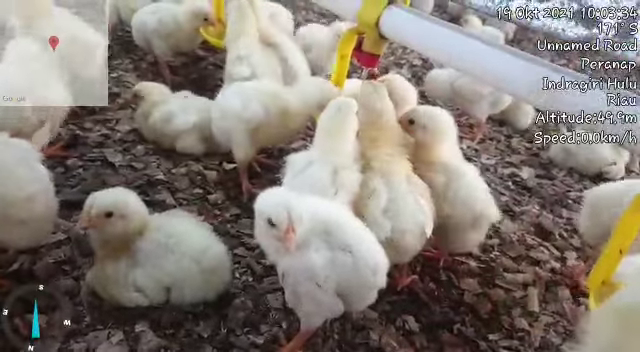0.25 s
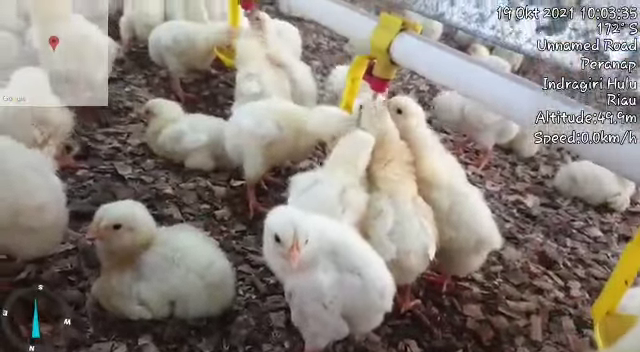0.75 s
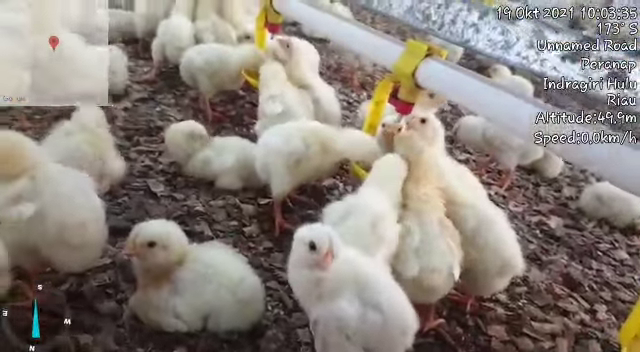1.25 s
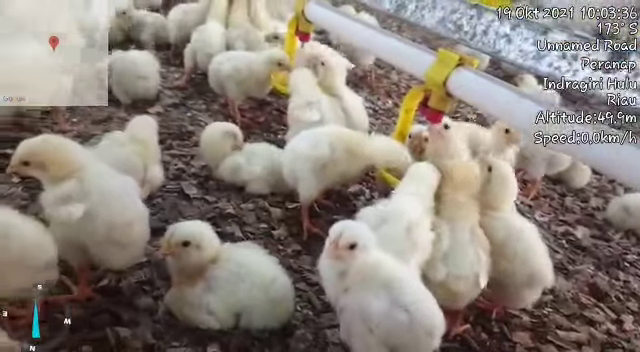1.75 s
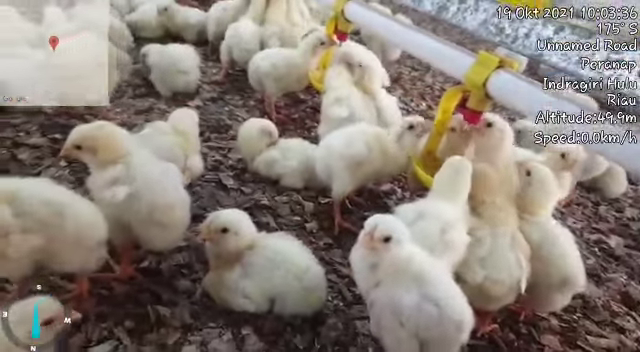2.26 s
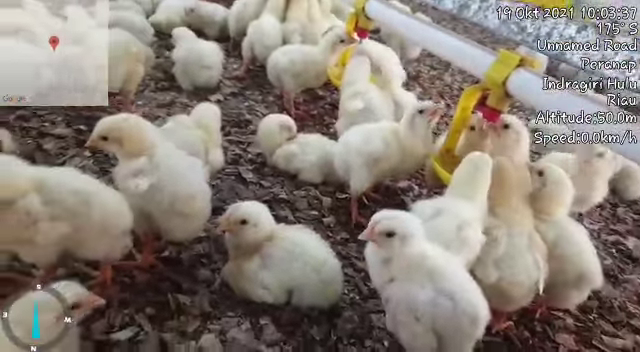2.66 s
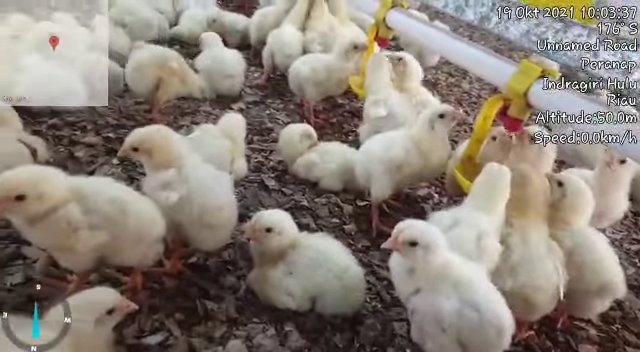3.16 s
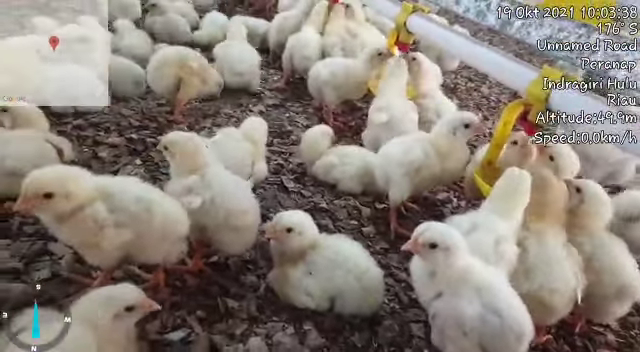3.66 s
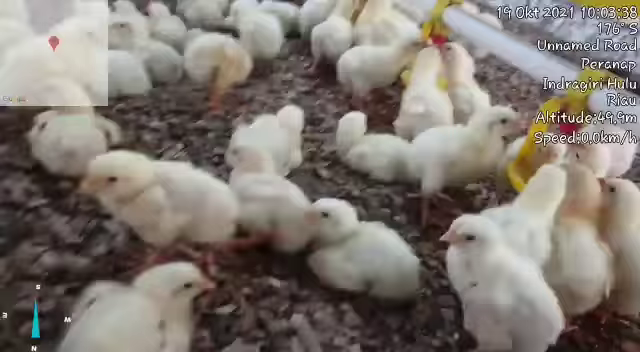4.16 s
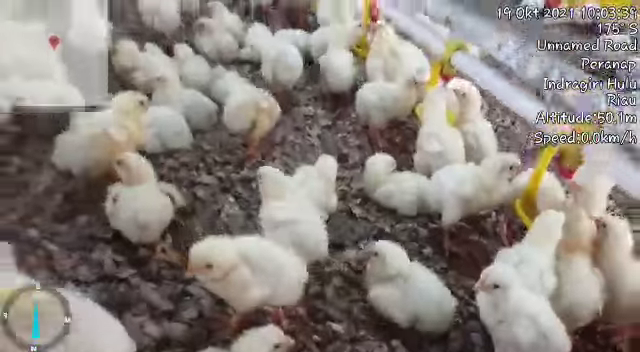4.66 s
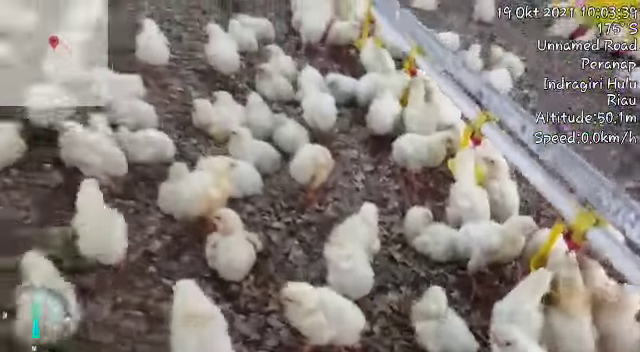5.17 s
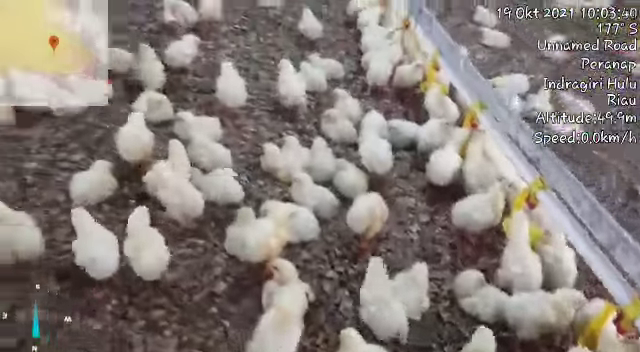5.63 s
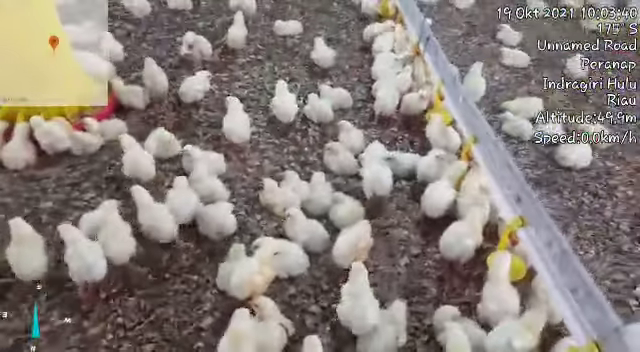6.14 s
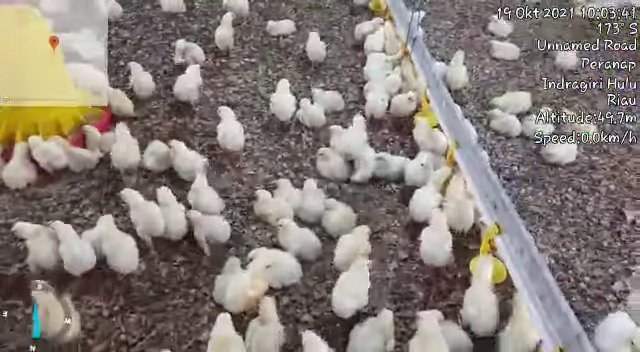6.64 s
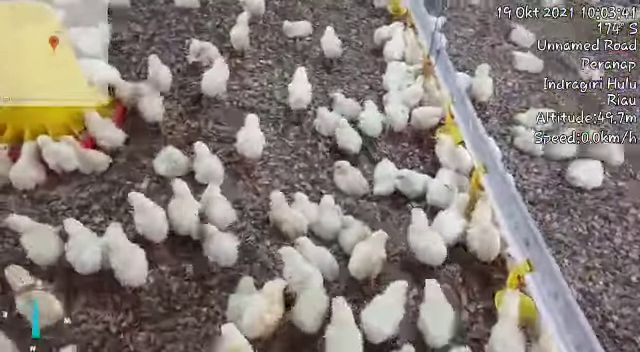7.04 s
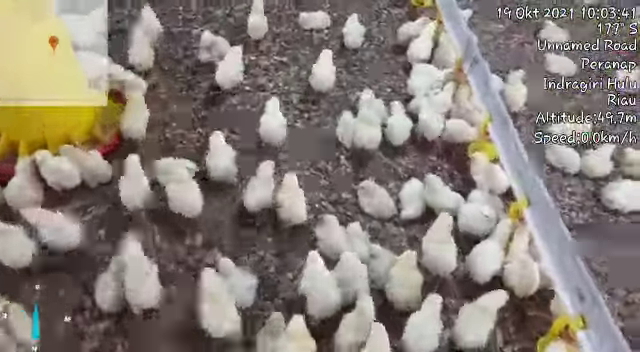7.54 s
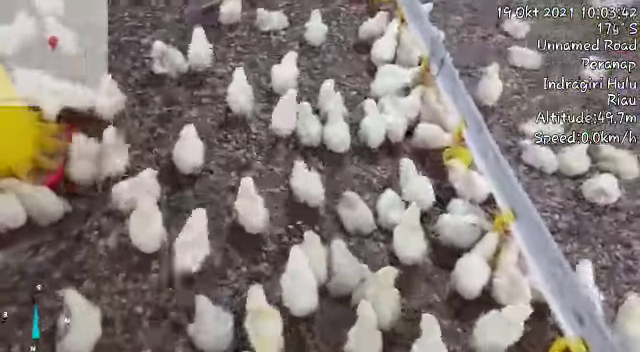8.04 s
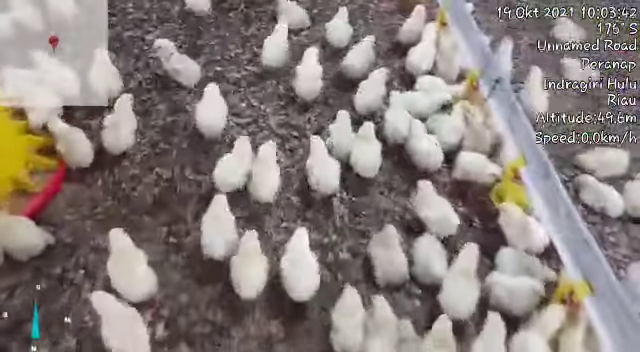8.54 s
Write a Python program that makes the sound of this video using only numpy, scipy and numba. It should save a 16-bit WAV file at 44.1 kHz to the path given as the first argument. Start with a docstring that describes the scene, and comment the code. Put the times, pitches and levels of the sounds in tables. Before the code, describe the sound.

A dense flock of chicks cheeps with short falling whistles and quick trills, amid dry ticks, litter rustle, a few hollow knocks and soft fan rumble.

```python
"""Chick flock in a poultry house

Heard by a two-microphone phone lifted from the litter. Near chicks give gliding whistled peeps and swinging
trills over a random chorus of far ones. Beaks and feet tick and rustle as filtered noise bursts; something
hollow is knocked and rings its modes; low swings thump the phone body. A fan hums in harmonics over
shaped house noise, and air stirs at the microphone ports as low noise."""
import sys
import numpy as np
from scipy import signal
from scipy.io import wavfile
from scipy.ndimage import uniform_filter1d
from numba import njit

SR = 44100
rng = np.random.default_rng(int(sys.argv[2]) if len(sys.argv) > 2 else 0)


def dump_mix(stems):
    """Bounce the given channels to the path in sys.argv[1] as a 16-bit WAV at rate SR."""
    frames = np.atleast_2d(stems).T  # one column per channel
    limited = np.clip(frames, -1, 1)  # hard clip at full scale
    pcm = np.round(limited * 32767).astype(np.int16)
    wavfile.write(sys.argv[1], SR, pcm)


N = 388080


def undb(db):
    """Decibels to gain."""
    return 10 ** (np.asarray(db) / 20)


def level(x, db):
    """Scale to an rms level."""
    return x * undb(db) / np.sqrt(np.mean(x ** 2))


def curve(rows, axis=1):
    """One column of a (t/s, value, ..) table at every sample."""
    table = np.array(rows)
    return np.interp(np.arange(N) / SR, table[:, 0], table[:, axis])


def at_hz(rows, hz):
    """A (f/Hz, value) table read on a log axis."""
    table = np.array(rows)
    return np.interp(np.log(hz), np.log(table[:, 0]), table[:, 1])


def walk(rate_hz):
    """Random levels held 1 / rate and slewed twice; spread near 1."""
    hold = int(SR / rate_hz)
    steps = np.repeat(rng.standard_normal(N // hold + 1), hold)
    return 1.3 * uniform_filter1d(uniform_filter1d(steps, hold), hold)[:N]


def band(x, hz, width_hz):
    """Resonance with gain 1 at its centre."""
    return signal.lfilter(*signal.iirpeak(hz, hz / width_hz, fs=SR), x)


def spikes(s, db, pan_db, lag_s):
    """One impulse per event in each channel, split by level and by right-channel lag."""
    out = np.zeros((2, N))
    for side, sign in enumerate((1, -1)):
        at = np.clip(((s - sign * lag_s / 2) * SR).astype(int), 0, N - 1)
        np.add.at(out[side], at, undb(db + sign * pan_db / 2))
    return out


ROOM_T60_S, ROOM_DB, FAR_ROOM_DB = 0.24, -10.0, -6.0


def room(x, wet_db):
    """Diffuse tail: decaying noise, unrelated in the two channels."""
    t = np.arange(int(0.4 * SR)) / SR
    tail = rng.standard_normal((2, len(t))) * 1000 ** (-t / ROOM_T60_S)
    tail *= np.clip(t / 0.0016, 0, 1)  # soft onset
    tail *= undb(wet_db) / np.sqrt(np.sum(tail ** 2, axis=1, keepdims=True))
    return x + signal.fftconvolve(x, tail, axes=1)[:, :N]


# noise balance: f/Hz, left minus right/dB
BALANCE_DB = [(50, -9.5), (130, 1.5), (380, 9.5), (1300, 6), (2400, -1), (15000, -1.5)]
# noise likeness: f/Hz, left-right correlation
LIKENESS = [(60, 0.35), (150, 0.65), (400, 0.23), (1000, 0.39), (2000, -0.22), (15000, 0.067)]


def noise_pair(hz, width_hz):
    """Stereo noise in one band, with the likeness and balance of that pitch."""
    like = np.clip(at_hz(LIKENESS, hz), -0.95, 0.95)
    noise = rng.standard_normal((2, N))
    mid, side = band(band(noise, hz, width_hz), hz, width_hz)
    pair = np.sqrt(1 + like) * mid + np.sqrt(1 - like) * side * np.array([[1], [-1]])
    return pair * undb(np.array([[0.5], [-0.5]]) * at_hz(BALANCE_DB, hz))


# house noise spectrum: f/Hz, relative level/dB per Hz
HOUSE = [(60, -13.5), (110, -5.5), (290, -24), (380, -23), (680, -25.5), (950, -16.5), (1300, -20),
         (2100, -22), (3000, -7), (5000, -19.5), (7800, -32.5), (11000, -17.5), (15000, -28.5)]
# swell of the noise around 1-2 kHz: t/s, level/dB (used relative to its mean)
MIDDLE = [(0.0, -70), (0.32, -57), (0.46, -67.5), (0.73, -70), (0.9, -62), (1.3, -71.5), (1.54, -61.5),
          (1.96, -70.5), (2.52, -61), (4.48, -65.5), (5.27, -62.5), (5.83, -70), (6.2, -66.5), (6.45, -57),
          (6.75, -62.5), (6.85, -57), (7.03, -61), (7.35, -64), (7.94, -66.5), (8.43, -65), (8.58, -61.5),
          (8.8, -63)]
MIDDLE_HZ, MIDDLE_OCTAVES, HOUSE_DB = 1430, 1, -52


def house():
    """Third-octave noise bands that drift in level, less in the treble; the middle ones swell together."""
    centres_hz = 60 * 2 ** np.arange(0, 8.1, 1 / 3)
    swell_db = curve(MIDDLE) - np.mean(curve(MIDDLE)) + 3.1 * walk(9)
    shares = np.exp(-(np.log2(centres_hz / MIDDLE_HZ) / MIDDLE_OCTAVES) ** 2)
    noise = np.zeros((2, N))
    for hz, share in zip(centres_hz, shares):
        drift_db = (3.6 if hz < 2993 else 1.6) * walk(4)
        noise += noise_pair(hz, hz / 3) * undb(at_hz(HOUSE, hz) + drift_db + share * swell_db)
    return level(noise, HOUSE_DB)


# house as the phone moves and turns, relative levels:
# t/s, air at the ports/dB, third fan harmonic/dB, fourth and fifth/dB
MOVING = [(0, -58.5, -67.5, -71.5), (1.2, -56.5, -70, -67.5), (2.2, -64, -71, -71.5),
          (3.2, -59.5, -64, -70), (4.2, -63, -63, -72.5), (4.8, -55, -62, -70), (5.8, -56.5, -75.5, -77.5),
          (6.6, -62, -94, -79.5), (7.8, -60, -83, -69.5), (8.8, -60, -91, -69.5)]
FAN_HZ = 56.26  # blade rate
DRONE_DB = 3.5  # over the fourth harmonic's setting


def fan():
    """Air rumble around the blade rate, wavering blade harmonics and an uneven drone."""
    air_db, third_db, upper_db = (curve(MOVING, axis=k) for k in range(1, 4))
    turn = 2 * np.pi * FAN_HZ * np.arange(N) / SR + 0.33 * walk(2)
    upper = np.sin(4 * turn) + 0.8 * np.sin(5 * turn) + 0.4 * np.sin(12 * turn)
    tones = undb(third_db) * np.sin(3 * turn) + undb(upper_db) * upper
    air = level(noise_pair(FAN_HZ, 35.0), 1.5) * undb(air_db + 2.2 * walk(5))
    drone_db = upper_db + curve(MIDDLE) - np.mean(curve(MIDDLE)) + 2 * walk(9.0)
    drone = level(noise_pair(952.0, 105.0), DRONE_DB) * undb(drone_db)
    return air + drone + tones * undb(0.78 * walk(3.56) + np.array([[1.5], [-1.5]]))


@njit
def whistle(rows, gains, overtone, swell, lean, n, sr):
    """Each peep is a near sine on a parabolic glide, with a soft start and end and a weak octave."""
    out = np.zeros((2, n))
    for e in range(len(rows)):
        s, length = rows[e, 0], rows[e, 1]
        start_hz, middle_hz, end_hz = rows[e, 2], rows[e, 3], rows[e, 4]
        bend = (start_hz + end_hz) / 2 - middle_hz
        slope = (end_hz - start_hz) / 2
        for side in range(2):
            start = s + side * rows[e, 7] / 1000  # right-channel lag in ms
            first = max(int(start * sr) + 1, 0)
            for i in range(first, min(int((start + length) * sr), n)):
                u = 2 * (i / sr - start) / length - 1  # -1 at the start, 1 at the end
                phase = np.pi * length * (middle_hz * u + slope * u * u / 2 + bend * u ** 3 / 3)
                envelope = (1 - u * u) ** swell * (1 + lean * u)
                tone = np.sin(phase) + overtone * np.sin(2 * phase)
                out[side, i] += gains[e, side] * envelope * tone
    return out


SWELL, LEAN = 0.42, 0.17  # softness of a peep's start and end; growth towards its end
OVERTONE_DB = -40.0


def sing(rows):
    """Whistle peeps: t/s, length/s, start/Hz, middle/Hz, end/Hz, level/dB, left minus right/dB, lag/ms."""
    gains = undb(rows[:, 5:6] + rows[:, 6:7] * np.array([0.5, -0.5]))
    return whistle(rows, gains, undb(OVERTONE_DB), SWELL, LEAN, N, float(SR))


WOBBLE_DB = 2  # fast random level flutter on the summed chorus and on the summed near calls
# far chorus: t/s, relative level/dB
CHORUS = [(0, -48), (.3, -49.5), (.8, -45.5), (1.2, -53), (1.8, -45.5), (2.9, -51.5), (4.4, -50.5),
          (5.1, -43.5), (6.4, -47.5), (6.9, -44.5), (7.3, -42), (7.58, -45), (7.75, -37), (8.35, -41),
          (8.8, -40)]
CHORUS_PEEPS_PER_S, CHORUS_LENGTH_S, CHORUS_SCATTER_DB = 220, 0.036, 2.5
CHORUS_HZ, CHORUS_SPREAD_HZ, CHORUS_FALL_HZ, CHORUS_ARCH_HZ = 2993, 331, 860, 192


def far_chicks():
    """Random peeps, mostly falling, from all directions; distance makes them wetter."""
    count = CHORUS_PEEPS_PER_S * N // SR
    even = rng.random((count, 2)).T
    bell = rng.standard_normal((count, 6)).T
    # calls crowd near the low end of the voice; the high callers are fewer and fainter
    high = np.minimum(np.abs(bell[5]), 1.9) * 1.8
    middle_hz = CHORUS_HZ + CHORUS_SPREAD_HZ * (high - 1)
    half_fall_hz = CHORUS_FALL_HZ * (0.63 + 0.45 * bell[0]) / 2
    arch_hz = CHORUS_ARCH_HZ * (0.5 + bell[1])
    start_hz = middle_hz + half_fall_hz - arch_hz
    end_hz = np.maximum(middle_hz - half_fall_hz - arch_hz, 2350)
    length_s = CHORUS_LENGTH_S * np.exp(0.35 * bell[2])
    db = CHORUS_SCATTER_DB * bell[3] - 1.05 * high
    pan_db, lag_ms = 3.4 * bell[4] - 2.1, even[1] - 0.5
    rows = np.array([even[0] * N / SR, length_s, start_hz, middle_hz, end_hz, db, pan_db, lag_ms]).T
    wet = room(sing(rows) * undb(WOBBLE_DB * walk(220)), FAR_ROOM_DB)
    return level(wet, -0.72) * undb(curve(CHORUS) + 1.5 * walk(9))


# feet in the litter: t/s, relative level/dB
RUSTLE = [(0, -61.5), (.7, -63.5), (1.7, -65), (2.2, -63.5), (3, -65), (3.5, -61), (4.3, -66.5), (5, -60.5),
          (6.2, -62.5), (7.3, -63.5), (8.3, -63), (8.8, -59.5)]
# beak ticks, relative levels: t/s, crack/dB, body/dB
TICKS = [(0.24, -37, -54), (0.2792, -34, -51), (0.3295, -33.5, -51), (0.3726, -38, -51), (0.7008, -41, -52),
         (0.752, -30.5, -43), (0.9148, -37, -46), (0.963, -37, -50), (1.206, -34.5, -49.5),
         (1.3421, -33.5, -42.5), (1.522, -36, -52), (1.8597, -39.5, -54), (2.0883, -40, -54),
         (2.1019, -37, -47.5), (2.1886, -31.5, -52), (2.2536, -33, -48), (2.2887, -34, -45),
         (2.376, -38, -47), (2.393, -33.5, -45), (2.606, -38, -54), (2.6244, -32, -48.5),
         (2.7041, -28.5, -44), (3.042, -33, -45), (3.2919, -33, -46), (3.342, -37, -50),
         (3.468, -39, -48.5), (3.5846, -43, -53), (3.601, -32, -45.5), (3.784, -36, -48),
         (3.9968, -35.5, -49), (4.0482, -39, -51.5), (4.356, -40, -53), (4.454, -36, -49),
         (4.692, -33.5, -50.5), (4.823, -38, -51), (4.9601, -32, -48), (5.1598, -36, -50),
         (5.217, -34, -47), (5.4798, -32.5, -47), (5.674, -37, -45.5), (5.7653, -36.5, -54),
         (5.937, -33.5, -51), (6.0326, -37.5, -48), (6.4969, -36.5, -48), (6.8748, -28.5, -50),
         (7.5152, -36.5, -54), (7.6111, -35, -55)]
# bright crack resonances: f/Hz, width/Hz, level/dB
CRACK = [(10830, 2930, 3.5), (12100, 4500, 0)]
# duller body resonances: f/Hz, width/Hz, level/dB
BODY = [(4820, 3740, 8), (1495, 1080, 1), (920, 89, -13)]
GRAINS_PER_S = 2500
CRACK_GAIN_DB, BODY_GAIN_DB = 18.5, 28.5  # tick bursts into each resonance set


def litter():
    """Typed ticks and bunched random grains, each a short burst with a bright crack and a duller body."""
    s, crack_db, body_db = np.transpose(TICKS)
    lag_s, pan_db = np.transpose(rng.uniform(-0.81, 1, (len(s), 2)) * [0.0005, 2.5] - [0, 3.0])
    count = GRAINS_PER_S * N // SR
    even = rng.random((count, 4)).T
    size_db = np.minimum(-3.3 * np.log(1 - even[1]), 22)
    grains = spikes(even[0] * N / SR, size_db, 6.2 * even[2] - 6.1, 0.001 * even[3] - 0.0005)
    bunching_db = np.minimum(4.5 * walk(60) + 1.5 * walk(16), 8.5)
    grains = level(grains * undb(bunching_db), 0.42) * undb(curve(RUSTLE))
    t = np.arange(int(0.1 * SR)) / SR
    burst = rng.standard_normal((2, len(t))) * (np.exp(-t / 0.0006) + 0.1 * np.exp(-t / 0.03))
    burst /= np.sqrt(np.sum(burst[:, :SR // 500] ** 2, axis=1, keepdims=True))  # energy of first 2 ms
    out = np.zeros((2, N))
    for db, grain_db, modes in ((crack_db + CRACK_GAIN_DB, 9.5, CRACK), (body_db + BODY_GAIN_DB, 7.0, BODY)):
        ticks = signal.fftconvolve(spikes(s, db, pan_db, lag_s), burst, axes=1)[:, :N]
        source = ticks + undb(grain_db) * grains
        for hz, width_hz, mode_db in modes:
            out += undb(mode_db) * band(band(source, hz, width_hz), hz, width_hz)
    return out


RIGHT_LAG_MS = 0.4337  # trills reach the left microphone first
TRILL_FADE_S, TRILL_RISE = 0.014, 0.09  # rise: share of the top pitch
DIP_DB, DIP_SCATTER_HZ, SWING_SCATTER_DB = 1.2, 80.0, 1.5
FALL_DB = 3.0  # falling strokes this much louder, rising ones weaker
HOARSE_ABOVE_HZ, HOARSE_SHARE = 4000.0, 0.11  # strained high voice: pitch tremble per Hz of excess


def trill(s, length, swing, top, first_dip, last_dip, db, pan_db):
    """One whistle swings evenly, lingers at tops, turns sharply and louder at dips; it climbs in, dips drift."""
    t = np.arange(-swing / 3, length, 1 / SR)
    turns = t / swing  # whole numbers are tops
    drop = (1 - np.cos(np.pi * np.abs(2 * (turns - np.round(turns))) ** 1.5)) / 2
    chance = rng.standard_normal((40, 2))
    waver_hz = HOARSE_SHARE * max(top - HOARSE_ABOVE_HZ, 0) * walk(1800)[:len(t)]
    high_hz = top * (1 - TRILL_RISE * np.exp(-np.maximum(turns, 0)))
    scatter_hz = DIP_SCATTER_HZ * chance[np.floor(turns).astype(int), 0]
    low_hz = first_dip + (last_dip - first_dip) * (t / length) ** 3 + scatter_hz
    phase = 2 * np.pi * np.cumsum(high_hz + (low_hz - high_hz) * drop + waver_hz) / SR
    fade_in = np.square((t - t[0]) / (2 * TRILL_FADE_S))
    fade = np.clip(np.minimum(fade_in, (length - t) / TRILL_FADE_S), 0, 1)
    stroke_db = DIP_DB * drop + FALL_DB * np.sin(2 * np.pi * turns)
    uneven_db = SWING_SCATTER_DB * np.interp(2 * turns, np.arange(40), chance[:, 1])
    voice = fade * undb(db + stroke_db + uneven_db) * np.sin(phase)
    out = np.zeros((2, N))
    for side, sign in enumerate((1, -1)):
        at = int((s + t[0] + side * RIGHT_LAG_MS / 1000) * SR) + np.arange(len(t))
        out[side, at] = voice * undb(sign * pan_db / 2)
    return out


# near peeps, with two faint overtones near 6.5 kHz as rows of their own:
# t/s, length/s, middle f/Hz, fall start to end/Hz, arch above the straight fall/Hz,
# level/dB before flutter, left minus right/dB
PEEPS = [(0.133, 0.042, 2800, 350.0, -10.0, -43.5, -2), (0.148, 0.065, 3060, 660.0, 30.0, -44.5, 7),
         (0.336, 0.026, 3330, 302, -200.0, -45, 0), (0.337, 0.036, 3750, -100.0, 60.0, -40, -3),
         (0.347, 0.1, 6560, 750.0, 450.0, -53.5, -8), (0.407, 0.05, 3160, 410, -25.0, -44, -2),
         (0.804, 0.077, 3090, 600.0, 100.0, -49, 10), (0.822, 0.11, 6360, 620.0, 350.0, -58, -11),
         (0.878, 0.04, 3000, 302, 225, -37, -1), (1.064, 0.061, 3015, 278, 65, -45.5, -12),
         (1.18, 0.023, 2370, -670.0, 120.0, -43.5, -2), (1.324, 0.084, 3180.0, 940.0, -34, -48.5, -8),
         (1.566, 0.04, 3020, 380.0, 100.0, -38, 0), (1.797, 0.035, 2940, -160.0, -530.0, -41, -8),
         (2.182, 0.04, 2860, 460, 70.0, -48, -1), (2.432, 0.049, 3620, 400, 450, -43.5, -4),
         (2.473, 0.023, 3240, -650, -100, -41, -5), (2.837, 0.03, 2850, 450, -30, -52, 0),
         (3.057, 0.069, 3400, 430, 304, -41, -1), (3.214, 0.037, 2660, 150, 50, -47, 0),
         (3.223, 0.048, 3320, 600, 200, -45, 2), (3.339, 0.042, 3030, -840.0, 152, -44, -6),
         (3.435, 0.034, 2516, -350, -35.0, -44, -4), (3.918, 0.036, 3060, 760.0, 50.0, -42, 7),
         (3.969, 0.063, 3380, 56, 643, -46, -5), (4.291, 0.04, 2990, 700, 100, -48, -5),
         (4.378, 0.035, 3120, 720.0, -140.0, -41, -7), (4.532, 0.04, 3110, 490.0, 150.0, -48.5, 8),
         (4.954, 0.066, 3695, -140.0, 158, -40.5, -5), (5.009, 0.04, 2860, 202, 40.0, -43, -14),
         (5.051, 0.046, 4080, -270.0, 380.0, -41, -4), (5.075, 0.049, 3335, 578, 410.0, -38.5, 7),
         (5.159, 0.047, 2890, 688, 48, -41, 0), (5.182, 0.04, 3070, 260.0, 110.0, -39.5, -8),
         (5.248, 0.048, 3360, 958, 149, -39, -10), (5.328, 0.086, 3500, 246, 225.0, -45, -2),
         (5.398, 0.039, 2900, 570.0, 10.0, -38.5, -7), (5.473, 0.047, 3060, 950, 0.0, -34, -5),
         (5.509, 0.029, 4300, 300, 1250, -40, 6), (5.513, 0.069, 3120, 430.0, 28, -45, -7),
         (5.551, 0.06, 4110, 50, 270, -29, -10.5), (5.601, 0.018, 3066, 700, -540.0, -28.5, -8),
         (5.628, 0.026, 2810, 580.0, 122, -46, 0), (5.707, 0.046, 3150, 790.0, 30.0, -46, 6),
         (5.817, 0.032, 3094, 720.0, 36, -32, -4), (5.844, 0.051, 2920, -110.0, -220.0, -44, -3),
         (5.872, 0.051, 3650, 600.0, -50.0, -40, -5), (5.959, 0.042, 2890, 630.0, 174, -32.5, -2),
         (6.09, 0.063, 2996, 652, 132, -34.5, -1), (6.103, 0.041, 2730, 232, 152, -36.5, 2),
         (6.104, 0.028, 3510, -60.0, 90.0, -40, -2.0), (6.143, 0.034, 2690, 42, -210.0, -44, 4),
         (6.148, 0.075, 1735, 98, 22, -45, -2), (6.167, 0.033, 3620, 190, 405.0, -41.5, 6),
         (6.185, 0.03, 2980, 550, -32, -40.5, 7), (6.3, 0.054, 3220, 1055, -10.0, -44, 11),
         (6.431, 0.059, 3960, 114, 50.0, -48, 2), (6.475, 0.033, 3190.0, 1070.0, -150.0, -37.5, 1),
         (6.497, 0.049, 3636, 270.0, 200.0, -44, -9), (6.532, 0.038, 3144, 870.0, 90.0, -39, 0),
         (6.576, 0.048, 3010.0, 613, 160.0, -40, -4), (6.585, 0.033, 3560, 370.0, 270.0, -39.5, 10),
         (6.616, 0.038, 2680, 460.0, 0, -44.5, 6), (6.623, 0.067, 3930, 778, 337, -45.5, -7.5),
         (6.648, 0.074, 2870, 492.5, 113, -43, 4), (6.788, 0.058, 2720, 530, 50.0, -40, -4),
         (6.793, 0.058, 2900, 572, 12, -44, 10), (6.801, 0.052, 3880, 590, 805.0, -35.5, 0),
         (6.922, 0.037, 3050, 730.0, 7, -35, 5), (7.002, 0.044, 3060.0, 588, 146, -40, -5.0),
         (7.129, 0.049, 3170, 423, -180.0, -41, 3), (7.272, 0.054, 3054, 838, 30, -38.5, -3),
         (7.31, 0.022, 2750, 100, -600.0, -41, 6), (7.353, 0.027, 2970, 360.0, -90.0, -37, 3),
         (7.383, 0.05, 3350, 500, 200.0, -42, 2), (7.434, 0.056, 2950, 216, -235.0, -40.5, -1),
         (7.495, 0.046, 2924, 680, 160.0, -38.5, 2), (7.635, 0.045, 2690, 340.0, 18, -41.5, 4),
         (7.68, 0.04, 2720, 400, 30, -42.5, -1), (7.771, 0.063, 2930, 750, -58, -39, -1),
         (7.846, 0.047, 2960, 500, 40, -37.5, 0), (7.901, 0.063, 2914, 650, -40, -38, 2),
         (7.971, 0.036, 3075, 600, 0, -36.5, -2), (8.011, 0.05, 2800, 550, 28, -37, -6),
         (8.06, 0.07, 3380, 277, 110.0, -34, -1), (8.065, 0.039, 4130, 610.0, 80.0, -45.5, -14),
         (8.108, 0.031, 2640, 260.0, 40.0, -40, 4), (8.173, 0.066, 3300, 700, 0, -38, 4),
         (8.201, 0.04, 2850, 620, -40, -37, 4), (8.262, 0.051, 2830, 500, 0, -38.5, -2),
         (8.305, 0.042, 2900, 450, 40, -39, -3), (8.345, 0.03, 2920, 450, 30, -41, -4),
         (8.372, 0.026, 3070, 850, 0, -40, -3), (8.392, 0.021, 4030, 100, 150, -36, -3),
         (8.458, 0.052, 2840, 128, -83, -46, 4), (8.462, 0.043, 3480, 800, 400.0, -38, 3),
         (8.57, 0.034, 4440, 300, 720, -36.5, -1.0), (8.644, 0.036, 4010, -550, 80, -37.5, -2),
         (8.688, 0.11, 3514, 347, 186, -33.5, -4), (8.7, 0.076, 2800, 608, -89, -46, -2)]
# trills: first top t/s, length/s, swing period/s, top f/Hz, first dip f/Hz, last dip f/Hz,
# base level/dB, left minus right/dB
TRILLS = [(.653, .1, .029, 4100, 3250, 2800, -48, -8.), (1.954, .095, .0322, 3450, 2500, 2480, -36.5, -4.),
          (1.9775, .092, .031, 4150, 2980, 2250, -33, -4.5), (2.268, .03, .031, 4650, 3200, 2900, -39, -8.),
          (2.489, .165, .0344, 3600, 2560, 2480, -42.5, -4.),
          (2.879, .08, .029, 4200, 3350, 2500, -44, -2.),
          (4.656, .226, .0321, 4170, 3000, 2350, -36.5, -4.5),
          (5.505, .1, .0285, 5400, 4720, 3700, -38, -5.), (6.863, .125, .031, 4400, 3400, 2450, -38, -2.),
          (7.058, .11, .033, 3500, 3000, 2350, -41, -2.), (7.688, .22, .0317, 3900, 2800, 2600, -38, -2.),
          (7.93, .12, .033, 3600, 2650, 2550, -39, -2.)]
PEEP_LAG_MS, LAG_SCATTER_MS = 0.36, 0.025  # peeps reach the left microphone first
ECHO_S, ECHO_DB, TRILL_ECHO_DB = 0.009, -8.0, -16.0  # a nearby hard surface


def near_chicks():
    """Typed peeps and trills share a random level flutter, its fast part independent in left and right."""
    flutter = undb(WOBBLE_DB * np.array([walk(220), walk(220)]) + 0.75 * walk(70))
    s, length_s, middle_hz, fall_hz, arch_hz, db, pan_db = np.transpose(PEEPS)
    lag_ms = PEEP_LAG_MS + LAG_SCATTER_MS * rng.standard_normal(len(s))
    start_hz = middle_hz + fall_hz / 2 - arch_hz
    end_hz = middle_hz - fall_hz / 2 - arch_hz
    rows = np.array([s, length_s, start_hz, middle_hz, end_hz, db, pan_db, lag_ms]).T
    peeps = sing(rows) * flutter
    trills = sum(trill(*row) for row in TRILLS) * flutter
    # a late copy beats against each glide and roughens it
    echo = undb(ECHO_DB) * peeps + undb(TRILL_ECHO_DB) * trills
    return peeps + trills + np.roll(echo, int(ECHO_S * SR), axis=1)


# thumps on the phone body: t/s, level/dB, left minus right/dB
THUMPS = [(1.748, -54, -5.0), (3.27, -43.5, -12), (3.301, -47, -8), (7.095, -47, 3)]


def thumps():
    """A soft low swing whose pitch sags."""
    s, db, pan_db = np.transpose(THUMPS)
    t = np.arange(int(0.1 * SR)) / SR
    cycles = 60 * t + 0.99 * (1 - np.exp(-t / 0.0036))
    swing = np.sin(2 * np.pi * cycles) * np.exp(-t / 0.0081)
    return signal.fftconvolve(spikes(s, db, pan_db, 0 * s), [swing], axes=1)[:, :N]


# knocks on something hollow: t/s, relative level/dB, brightness/dB per mode, left minus right/dB
KNOCKS = [(6.404, -72, 4.5, 6), (6.811, -66.5, 6, 7), (6.83, -70, 5, 8), (6.872, -67, 5, 8),
          (6.944, -52.5, 1, 6.5), (7.065, -60, 4, 5), (7.145, -47.5, -24, 5)]
# its modes: f/Hz, level/dB, t60/s
HOLLOW = [(564, -1.5, 0.045), (980, 4, 0.025), (1440, 0, 0.03), (1830, -4, 0.016), (2350, -2, 0.012)]
RATTLE_S, RATTLE_DB = 0.012, -19.0


def knocks():
    """Each blow is a short rattle ringing the same modes; a brighter blow favours the upper ones."""
    s, db, bright_db, pan_db = np.transpose(KNOCKS)
    t = np.arange(int(0.1 * SR)) / SR
    blows = spikes(s, db, pan_db, 0 * s)
    decay = signal.fftconvolve(blows, [np.exp(-t / RATTLE_S)], axes=1)[:, :N]
    rattle = blows + undb(RATTLE_DB) * rng.standard_normal(N) * decay
    latest = np.searchsorted(s, np.arange(N) / SR + 0.001) - 1  # blow in force at each sample
    tilt_db = bright_db[np.clip(latest, 0, None)]
    out = np.zeros((2, N))
    for k, (hz, mode_db, t60_s) in enumerate(HOLLOW):
        ring = np.sin(2 * np.pi * hz * t) * 1000 ** (-t / t60_s)
        out += signal.fftconvolve(rattle * undb(mode_db + k * tilt_db), [ring], axes=1)[:, :N]
    return out


def scene():
    """Near chicks, litter and knocks share the room; thumps and air reach the phone directly."""
    floor = room(near_chicks() + litter() + knocks(), ROOM_DB)
    return floor + far_chicks() + thumps() + house() + fan()


EDGE_HZ, TOP_HZ = 14600, 16500


def record(dry):
    """The top fades above the edge and is then cut."""
    soft = signal.sosfilt(signal.butter(10, EDGE_HZ, fs=SR, output="sos"), dry)
    return signal.sosfilt(signal.ellip(10, 0.2, 70, TOP_HZ, fs=SR, output="sos"), soft)


dry = scene()
out = record(dry)
dump_mix(out)
```